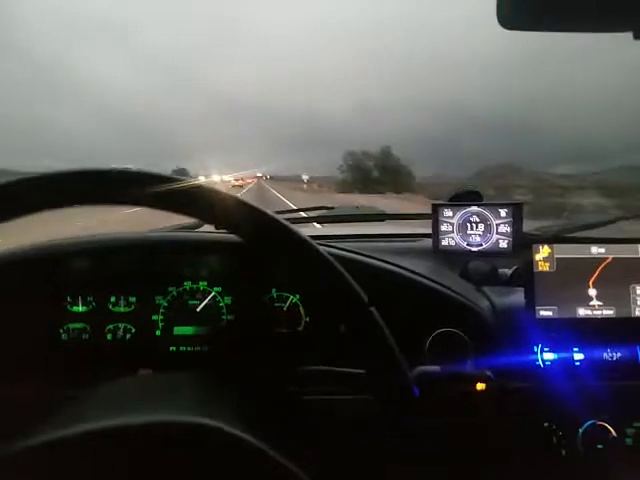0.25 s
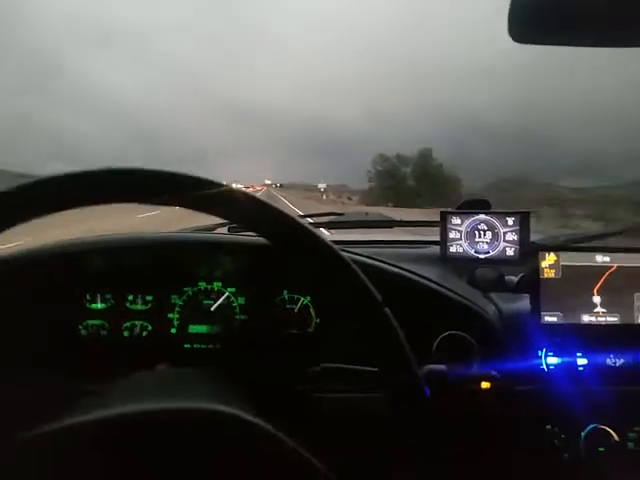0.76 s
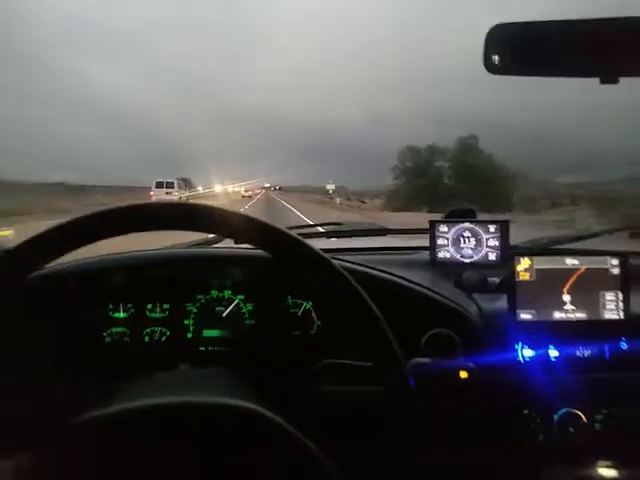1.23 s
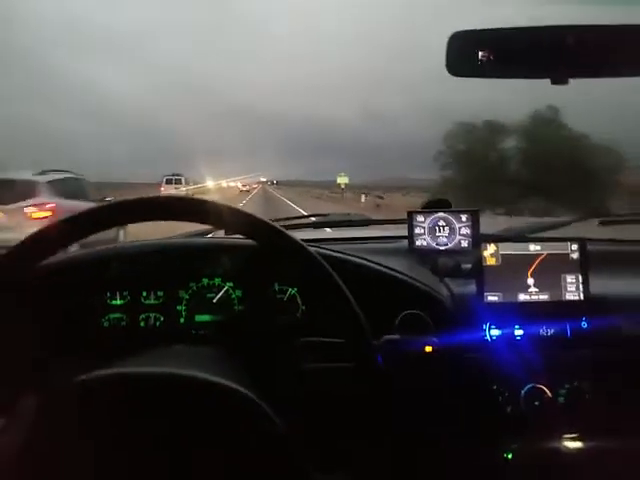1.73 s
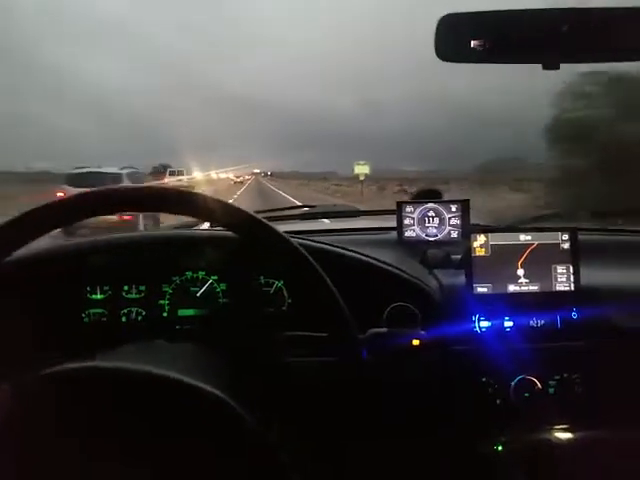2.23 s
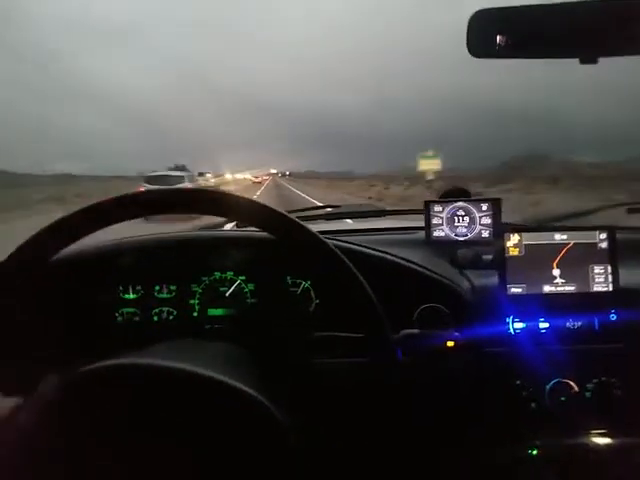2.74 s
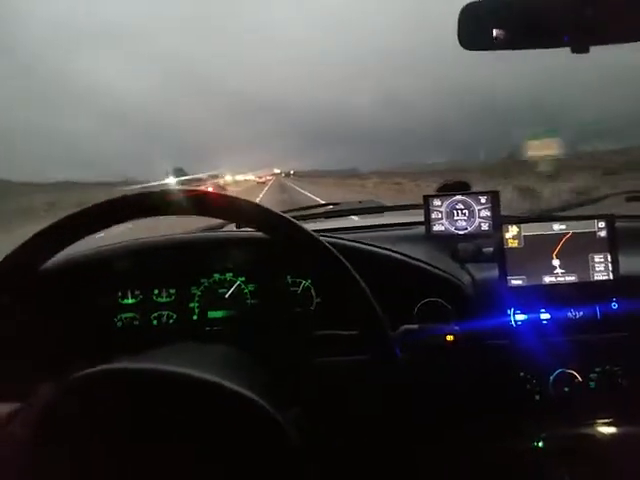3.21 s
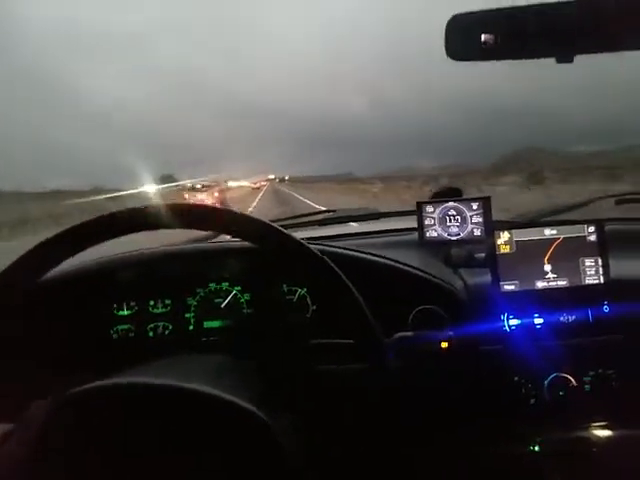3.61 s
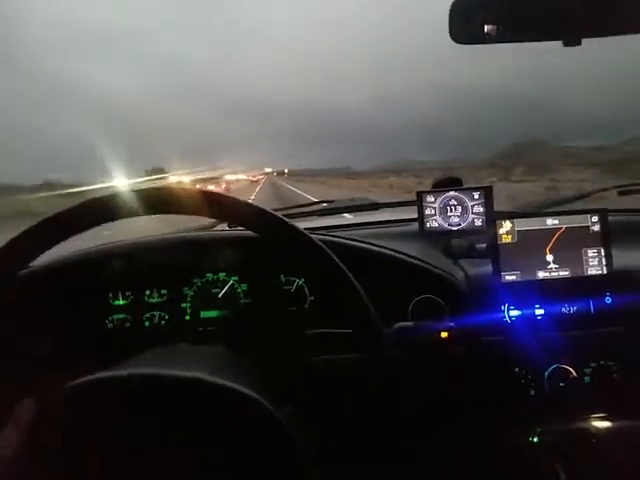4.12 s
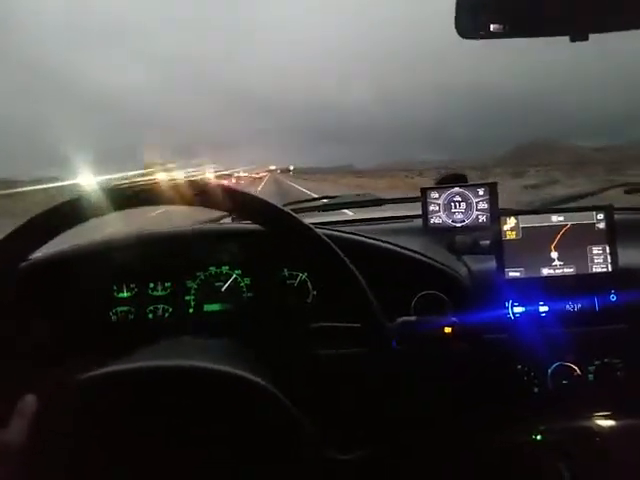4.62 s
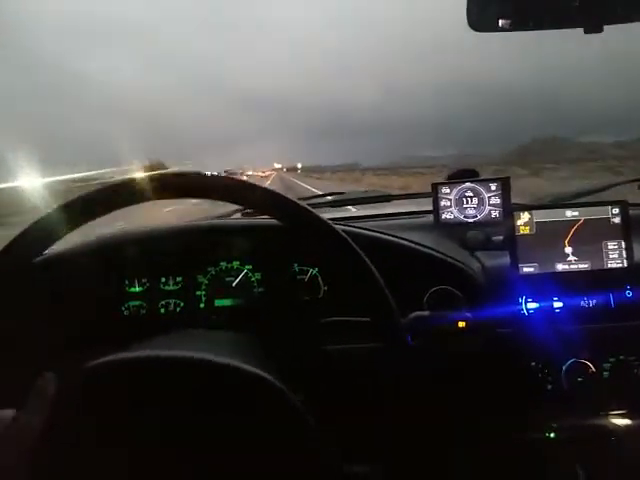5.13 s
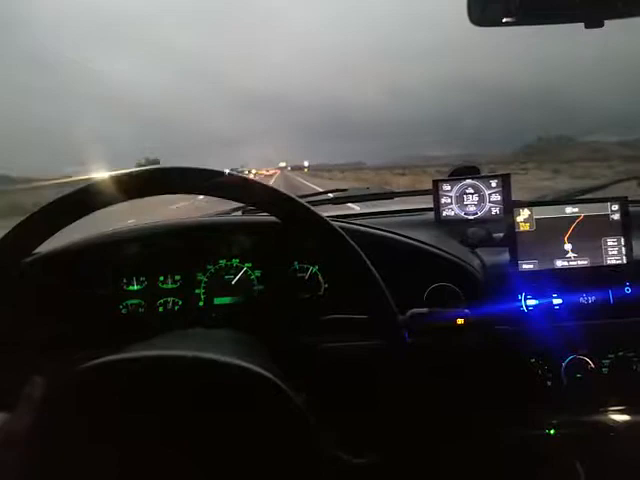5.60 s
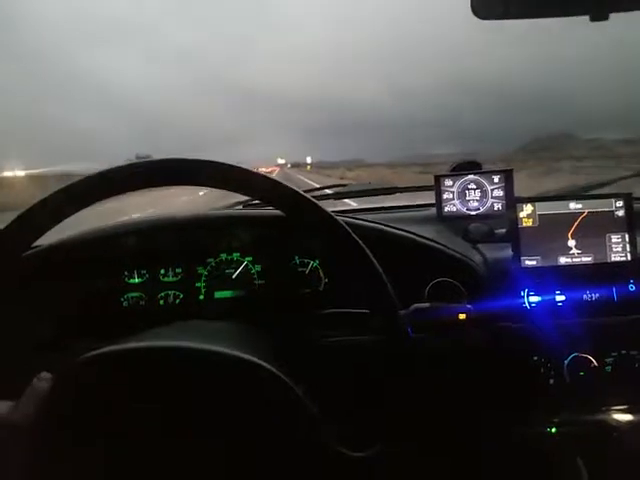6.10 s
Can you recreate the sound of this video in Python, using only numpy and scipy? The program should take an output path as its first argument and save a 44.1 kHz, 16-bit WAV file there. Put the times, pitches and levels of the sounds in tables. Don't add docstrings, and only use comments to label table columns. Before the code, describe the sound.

Constant low diesel drone heard from the driver's seat while climbing a grade, rough tyre rumble beneath, airy hiss and thin wavering turbo whine above.

```python
import sys
import numpy as np
from scipy import signal
from scipy.fft import rfft, irfft, next_fast_len
from scipy.io import wavfile
from scipy.ndimage import uniform_filter1d

SR = 44100
rng = np.random.default_rng(int(sys.argv[2]) if len(sys.argv) > 2 else 0)


def master_out(mix):
    frames = np.transpose(np.atleast_2d(mix))
    ceiling = np.clip(frames, -1, 1)
    pcm = np.round(ceiling * 32767).astype(np.int16)
    wavfile.write(sys.argv[1], SR, pcm)


def level_to_linear(level):
    exponent = np.asarray(level, float) / 20
    return 10 ** exponent


N = 280035
TIME = np.arange(N) / SR

# time_s, firing_hz
FIRING_SPEED = [
    (0.0, 183.3),
    (1.4, 183.07),
    (3.05, 182.76),
    (3.6, 183.27),
    (4.7, 183.98),
    (5.9, 184.43),
    (6.35, 184.2),
]
# time_s, firing_boom_db
ENGINE_LOAD = [(0.0, -15.5), (0.85, -15), (1.3, -12.5), (1.95, -13.5), (2.3, -14), (3.2, -13), (3.45, -12),
               (3.85, -11), (4.2, -12.5), (5.5, -13.5), (6.35, -15)]
# time_s, blade_tone_hz
BLADE_TONE = [(0.0, 7314), (0.6, 7421), (1.65, 7428), (2.6, 7232), (2.9, 7212), (3.28, 7170), (3.74, 7671),
              (3.98, 7820), (4.2, 7848), (4.6, 7833), (5.05, 7780), (5.6, 7762), (6.0, 7705), (6.35, 7685)]
# centre_s, half_length_s, level_db
BLADE_FLARES = [(0.46, 0.066, -47), (0.77, 0.054, -55), (1.23, .14, -41.5), (1.52, .06, -47),
                (2.05, 0.13, -52), (2.3, .06, -52), (2.86, 0.19, -53), (3.45, .08, -51), (3.72, 0.22, -47),
                (4.25, 0.091, -58), (4.58, .08, -53), (5.17, .05, -53), (5.4, .1, -52), (5.88, 0.15, -49.5),
                (6.22, .1, -51)]
# centre_s, half_length_s, level_db
BLADE_OCTAVE_FLARES = [(0.98, .12, -51), (1.38, .1, -54), (1.72, .1, -59), (2.1, .05, -55), (2.8, .12, -57),
                       (3.55, .15, -56), (4.22, .12, -42), (4.65, .15, -53), (5.0, .1, -53),
                       (5.28, .15, -52), (5.6, .1, -54), (5.83, .1, -49), (6.2, .1, -54)]
# centre_s, half_length_s, rumble_db, hiss_db,
# roof_boom_db
ROAD_PATCHES = [(0.5, 0.11, 2.5, .3, 2), (1.4, 0.43, 1, 1.5, 0.5), (2.0, 0.091, -1, -0.5, 0),
                (2.45, 0.11, 1.5, -1, 1), (2.83, 0.088, 0.5, 0.5, 3.5), (3.12, .1, -0.5, 0.5, -7),
                (3.35, 0.07, -0.5, 0, 3.5), (3.62, 0.091, 1, 0.5, 4.5), (4.1, .1, 0, 0, -4.5),
                (5.37, .07, 3, 0.5, 5.5), (5.8, 0.059, 1.5, -1, 3.5), (6.1, .12, -0.5, 0, -6),
                (6.35, 0.035, -5, 3.5, 0)]
WEAK_ORDERS = (2, 3, 7, 9, 11, 12, 13, 14, 15, 16, 17, 18, 20, 24, 25, 26, 27, 28, 29)
# level_db (re firing boom), left_minus_right_db
WEAK_ORDER_LEVELS = [(-16.5, 0.5), (-28.5, 4), (-30.5, 1.5), (-20, 2.5), (-28, 5.5), (-27.5, -6), (-34, 1),
                     (-18, 4.5), (-17, 2), (-26, 6.5), (-30.5, 9), (-21.5, 2.5), (-27, 2), (-31, 7),
                     (-34.5, 9.5), (-35, 2), (-28.5, 9.5), (-32, 7), (-33.5, 6)]
# order (waves per engine cycle), level_db (per order)
CLATTER_SPECTRUM = [(19, -50.5), (23, -58.5), (30, -56), (33, -54), (39, -55.5), (47, -54), (52, -64),
                    (59, -58), (66, -62), (73, -58), (90, -60), (108, -60), (125, -67.5), (160, -74)]
# freq_hz, density_db (per Hz)
RUMBLE_SPECTRUM = [(6, -22.5), (35, -5), (60, -7), (80, -0.5), (115, -3.5), (160, 1.5), (215, -3),
                   (250, -1), (290, -11.5), (340, -8), (420, -10.5), (500, -20.5), (800, -20.5),
                   (1100, -39)]
# freq_hz, density_db (per Hz)
HISS_SPECTRUM = [(410, -36), (700, -7.5), (808, -2), (932, -7), (1320, -6.5), (1550, -11.5), (2030, -12.5),
                 (2470, -16.5), (3520, -22), (4870, -20.5), (6650, -27.5), (7580, -25), (8410, -35),
                 (15100, -29.5), (15700, -29)]
# freq_hz, width_hz, level_db
CAB_RINGS = [(1310, 21, 1), (1463, 36, 2), (1690, 41, 9), (1770, 36, -8.5), (2060, 69, 0.5), (2183, 44, 2),
             (2376, 69, -8.5), (2470, 60, -0.5), (2890, 39, 2), (3250, 82, 3), (4180, 200, -1.5),
             (8650, 150, 4), (9630, 70, -1.5), (11300, 150, -3.5)]
# freq_hz, likeness (0-1), left_minus_right_db, left_lead (samples)
PHONE_PORTS = [(40, 1, -2, -1), (91.5, 1, 1, 4.5), (200, 0.79, 0, 3), (296, 0.76, 4, 0.5),
               (427, 0.94, -1.5, 11), (700, 0.28, 3, -3.5), (1210, 0.35, 1, 12.5), (1750, 0.74, 0, 14.5),
               (2700, 0.27, -1, 20), (5030, 0.01, -4, 15.5), (8000, 0.03, 3.5, 21), (12000, 0.3, 1, 18.5),
               (15500, .2, 10, 19.5)]


def curve(table):
    time_s, *columns = np.transpose(table)
    return [np.interp(TIME, time_s, column) for column in columns]


def walk(rate):
    hop = 16
    k = int(SR / hop / rate)
    steps = np.repeat(rng.standard_normal(N // hop // k + 2), k)
    smooth = uniform_filter1d(uniform_filter1d(steps, k), k)
    return 1.18 * np.interp(TIME, np.arange(len(steps)) * hop / SR, smooth)


def flares(rows, rest_db):
    power = level_to_linear(rest_db) ** 2
    for centre_s, half_s, db in rows:
        power = power + level_to_linear(db) ** 2 * np.exp(-2 * ((TIME - centre_s) / half_s) ** 2)
    return 10 * np.log10(power)


def tone(phase, db, pan_db, lag):
    left = level_to_linear(pan_db / 2) * np.cos(phase + lag / 2)
    right = level_to_linear(-pan_db / 2) * np.cos(phase - lag / 2)
    return np.sqrt(2) * level_to_linear(db) * np.array([left, right])


def port_noise(spectrum, flicker_db, flicker_rate):
    size = next_fast_len(N)
    hz = np.arange(1, size // 2 + 2) * SR / size
    port_hz, *columns = np.transpose(PHONE_PORTS)
    like, pan_db, lead = (np.interp(np.log(hz), np.log(port_hz), column) for column in columns)
    like = np.clip(like, 0, 1)

    shared, left, right = rfft(rng.standard_normal((3, size)))
    turn = np.exp(1j * np.pi * hz * lead / SR)
    pair = np.array([shared * turn, shared / turn]) * np.sqrt(like)
    pair += np.array([left, right]) * np.sqrt(1 - like)

    spectrum_hz, spectrum_db = np.transpose(spectrum)
    db = np.interp(np.log(hz), np.log(spectrum_hz), spectrum_db, -120, -120)
    for ring_hz, width_hz, ring_db in CAB_RINGS:
        db += ring_db * np.exp(-((hz - ring_hz) / width_hz) ** 2)
    pair = pair * level_to_linear(db + np.array([pan_db, -pan_db]) / 2)

    out = 0
    place = 2 * np.log(np.maximum(hz, 55))
    lowest = int(2 * np.log(max(spectrum_hz[0], 55)))
    highest = int(2 * np.log(spectrum_hz[-1])) + 1
    for band in range(lowest, highest + 1):
        share = np.clip(1 - abs(place - band), 0, 1)
        band_noise = irfft(pair * np.sqrt(share), size)[:, :N]
        out = out + band_noise * level_to_linear(flicker_db * walk(flicker_rate))
    return out / np.sqrt(np.mean(out ** 2))


def patches():
    return sum(np.array(db)[:, None] * np.exp(-((TIME - centre_s) / half_s) ** 2)
               for centre_s, half_s, *db in ROAD_PATCHES)


def road(cycle, pull_db):
    rough_rumble_db, rough_hiss_db, _ = patches()
    rumble_db = -22.5 + 0.14 * pull_db + rough_rumble_db
    hiss_db = -35.5 + 0.22 * pull_db - 0.25 * TIME + rough_hiss_db
    throb = np.cos(cycle) + 0.7 * np.cos(3 * cycle) + 0.6 * np.cos(8 * cycle)
    rumble = level_to_linear(rumble_db + 3.0) * port_noise(RUMBLE_SPECTRUM, 1.3, 12)
    hiss = level_to_linear(hiss_db + 2.5 + 0.5 * throb) * port_noise(HISS_SPECTRUM, 0.93, 10)
    return rumble + hiss


def wheels():
    tread_hz = 134.8
    return tone(2 * np.pi * tread_hz * TIME + 1.36 * walk(3), -36.5 + 2.5 * walk(4.6), 3, 0.16)


def driveline(cycle):
    peak_s, swell_s, swell_db = 3.4, 1.8, 9
    gear = 32 / 3
    hum_db = -36.5 + swell_db * np.exp(-((TIME - peak_s) / swell_s) ** 2)
    hum_db += 1.5 * patches()[0]
    return tone(gear * cycle + 0.4 * walk(3), hum_db + 2.6 * walk(9.9), 1.5, 0.2)


def duct():
    blade_hz, = curve(BLADE_TONE)
    duct_hz, wakes_hz, span_hz = 7585, 7810, 130
    wake_db = -6 * ((blade_hz - wakes_hz) / span_hz) ** 2
    phase = 2 * np.pi * np.cumsum(duct_hz + 12 * walk(13)) / SR
    return tone(phase, -55.5 + wake_db + 3 * walk(12), 2.5, 2.4)


def turbo(cycle):
    blade_hz, = curve(BLADE_TONE)
    tone_db = flares(BLADE_FLARES, rest_db=-60)
    octave_db = flares(BLADE_OCTAVE_FLARES, rest_db=-61)
    wavering_hz = uniform_filter1d(blade_hz, SR // 6) + 6 * walk(60)
    phase = 2 * np.pi * np.cumsum(wavering_hz) / SR
    out = tone(phase, tone_db - 2.5 + 2.5 * walk(30), 4, 1.4)
    out += tone(2 * phase + 0.8 * walk(120), octave_db - 6 + 2.5 * walk(28), 13, 0.7)

    firing, firing_hz, resonance_hz = 8 * cycle, 183, 7450
    for shift, db in [(-1, -55.5), (0.99, -58.0)]:
        resonance_db = -10 * ((blade_hz + shift * firing_hz - resonance_hz) / 250) ** 2
        out += tone(phase + shift * firing, db + resonance_db + 3 * walk(4.2), 2.5, 2.3)
    blur_db = -53 - 5 * ((blade_hz - resonance_hz) / 330) ** 2 + 2 * walk(2.8)
    blur = level_to_linear(blur_db) * np.array([walk(700), 0.92 * walk(700)]) * np.cos(phase)

    gust_db = -55 + 0.014 * (blade_hz - 7500) + 5.0 * walk(45)
    octave_blur = level_to_linear(gust_db) * np.array([walk(600), 0.2 * walk(600)]) * np.cos(2 * phase)
    return out + blur + octave_blur


def clatter(cycle):
    first, last = round(CLATTER_SPECTRUM[0][0]), round(CLATTER_SPECTRUM[-1][0])
    orders = np.setdiff1d(np.arange(first, last + 1), WEAK_ORDERS)
    chance = rng.standard_normal((8, len(orders)))
    db = np.interp(orders, *np.transpose(CLATTER_SPECTRUM)) + 1.5 * chance[0]
    pan_db = 2 + 3.5 * chance[1]
    spread = np.clip((orders - 5) / 18, 0, 3)
    size = 2 ** 16
    place = (cycle * size / (2 * np.pi)).astype(int) % size

    out = 0
    drifting = [(chance[2:4], 1), (chance[4:6], 0.2 * walk(2.62)), (chance[6:8], 1.23 * walk(2.53))]
    for (knock_turn, port_turn), weight in drifting:
        left_phase = spread * knock_turn
        right_phase = left_phase + 1.28 * port_turn - 0.055 * orders
        lines = np.zeros((2, size // 2 + 1), complex)
        lines[0, orders] = level_to_linear(db + pan_db / 2) * np.exp(1j * left_phase)
        lines[1, orders] = level_to_linear(db - pan_db / 2) * np.exp(1j * right_phase)
        shape = irfft(lines, size) * size / np.sqrt(2)
        out = out + weight * shape[:, place]
    return out


def engine(cycle, boom_db, half_db, three_db):
    crest, lag_per_order = -1.0, 0.026
    firing, half, three = 8, 4, 6
    boom_lag = three * lag_per_order
    out = tone(firing * cycle + crest, boom_db + 0.5 * walk(25), 0.6, firing * lag_per_order)
    out += tone(half * cycle + crest, half_db + walk(14), 3.4, boom_lag)
    ahead = 0.9
    out += tone(three * cycle + crest + ahead, three_db + walk(14), 5.4, boom_lag)

    for order, (db, pan_db) in zip(WEAK_ORDERS, WEAK_ORDER_LEVELS):
        slip = 0.2 * walk(5)
        turn = np.pi * (order > 16.5) + 0.024 * order * rng.standard_normal()
        phase = order * cycle + crest + turn + slip
        out += tone(phase, boom_db.mean() + db + 1.06 * walk(4), pan_db, order * lag_per_order)
    return out


def scene():
    firing_hz, = curve(FIRING_SPEED)
    boom_db, = curve(ENGINE_LOAD)
    pull_db = boom_db - boom_db.mean()
    cycle = 2 * np.pi * np.cumsum(firing_hz / 8) / SR
    half_db = -20.5 + 0.39 * pull_db
    three_db = -22.5 + 0.3 * pull_db + patches()[2]

    background = road(cycle, pull_db) + wheels() + driveline(cycle)
    whistles = duct() + turbo(cycle)
    return background + whistles + clatter(cycle) + engine(cycle, boom_db, half_db, three_db)


def band_limit(x):
    return signal.sosfilt(signal.butter(12, 17000, fs=SR, output="sos"), x)


def record(dry):
    ceiling = 1.2
    rounded = ceiling * np.tanh(dry / ceiling)
    top_cut = signal.ellip(14, 0.3, 60, 15745, fs=SR, output="sos")
    mix = signal.sosfilt(top_cut, rounded)
    return band_limit(mix)


dry = scene()
out = record(dry)
master_out(out)
```